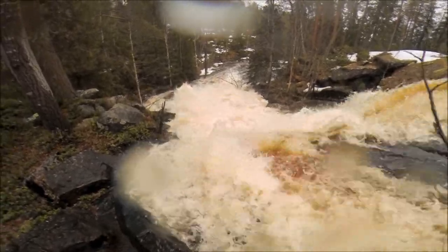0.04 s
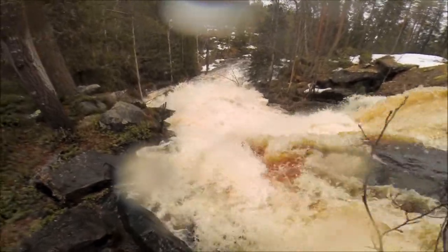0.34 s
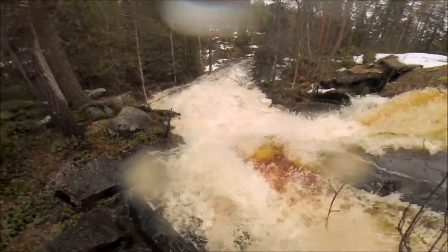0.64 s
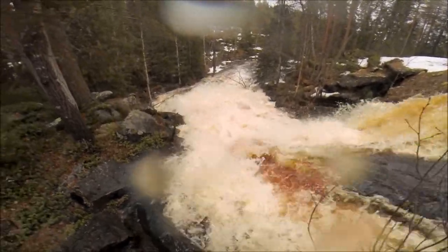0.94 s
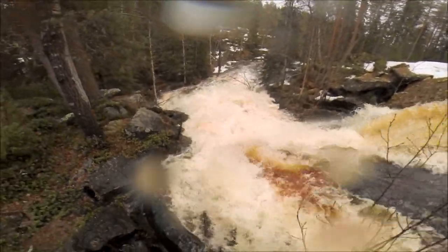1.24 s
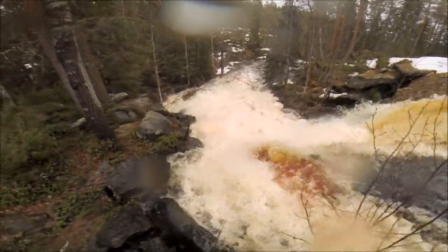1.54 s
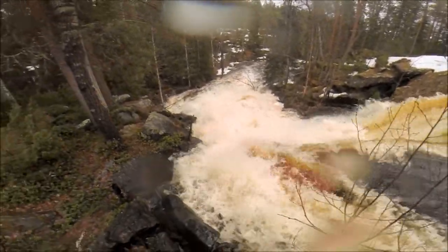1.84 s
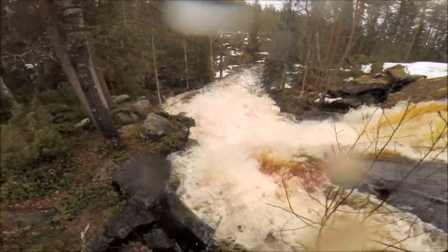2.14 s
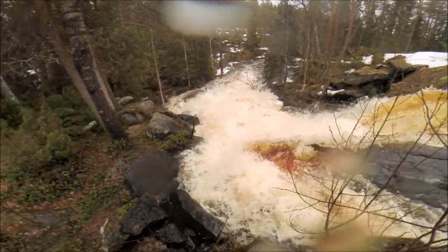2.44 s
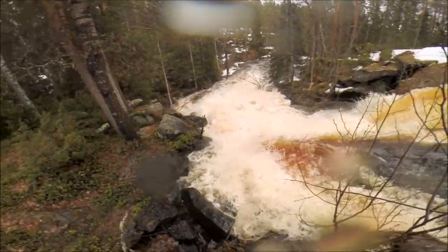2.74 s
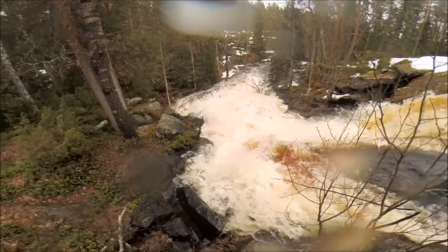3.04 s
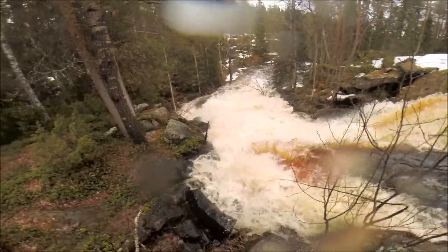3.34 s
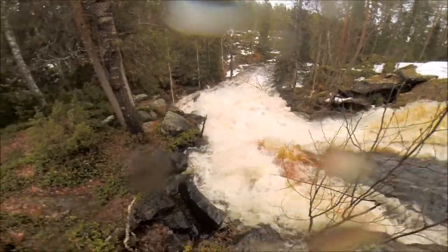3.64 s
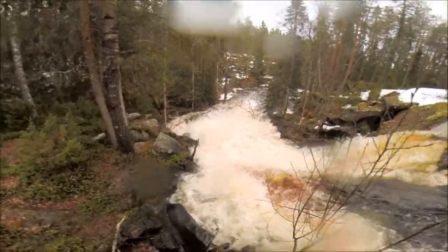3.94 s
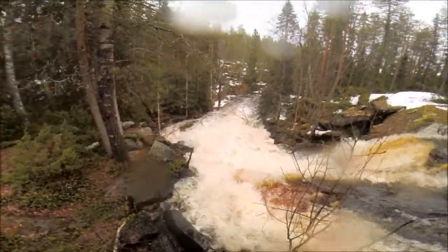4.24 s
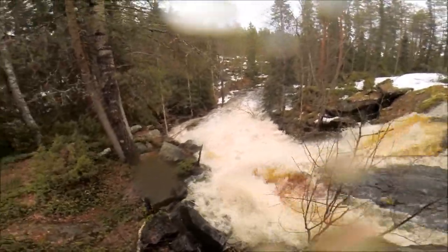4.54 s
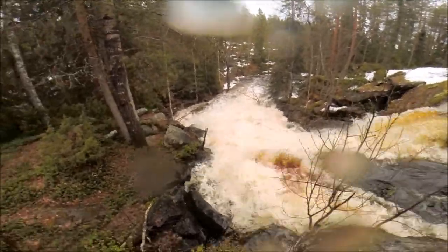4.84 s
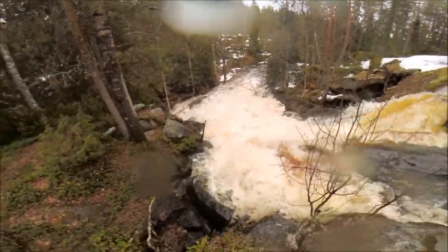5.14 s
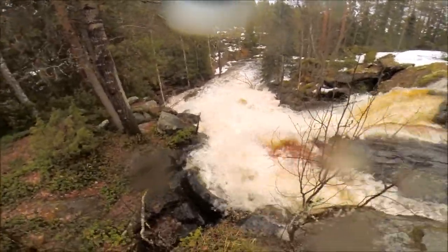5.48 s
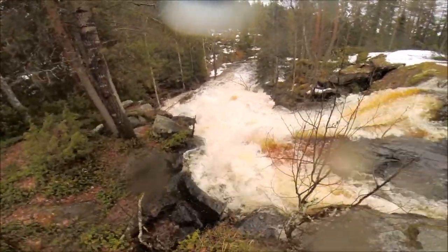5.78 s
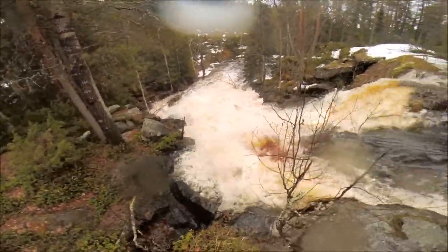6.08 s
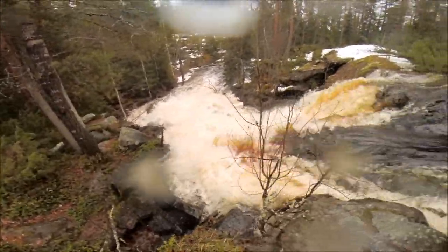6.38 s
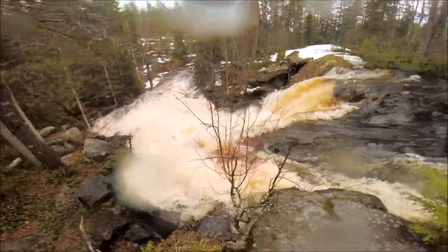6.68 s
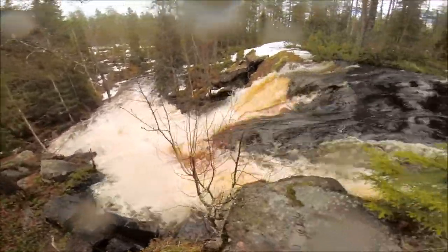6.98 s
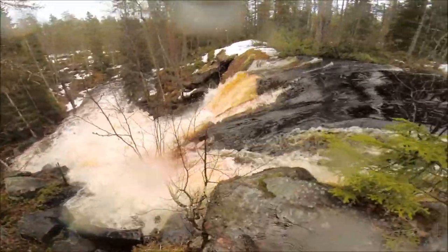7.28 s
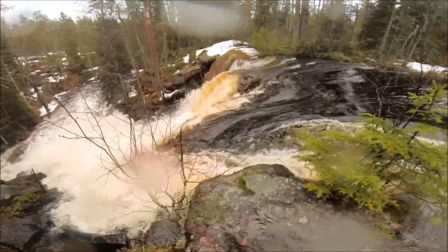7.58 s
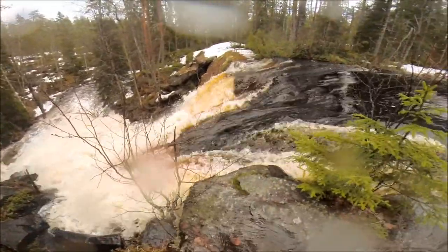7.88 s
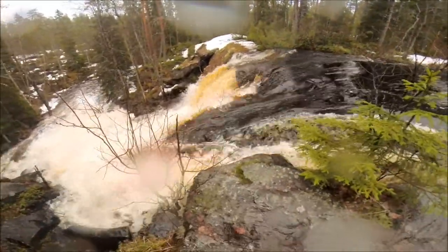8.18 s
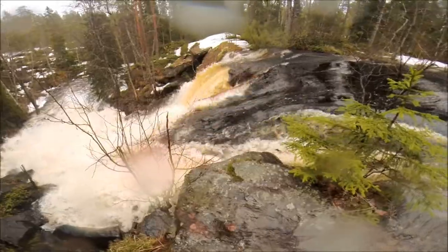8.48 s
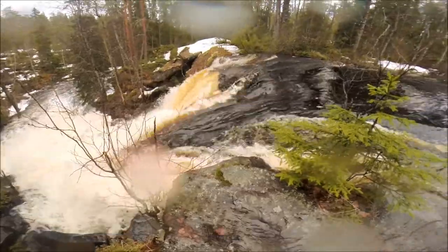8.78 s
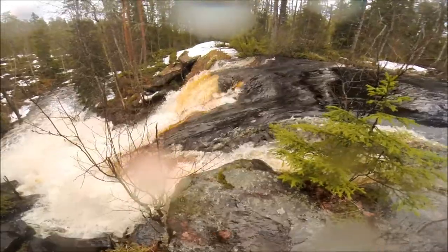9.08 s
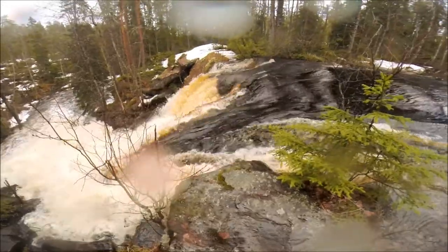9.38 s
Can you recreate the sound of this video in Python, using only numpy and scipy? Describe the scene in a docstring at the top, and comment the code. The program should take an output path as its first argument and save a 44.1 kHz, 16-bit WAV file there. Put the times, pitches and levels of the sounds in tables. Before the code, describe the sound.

Steady, boxy rush of a flooded waterfall and rapids, with occasional dull bumps, plastic clicks and a light wind rumble.

```python
"""Beside a big waterfall in flood, heard by one microphone in a hand-held camera's plastic case.
Bubbles and drops merge into a steady roar. The case rings and gives it a hollow colour,
which shifts as the camera turns towards the rapids upstream. Handling adds low thumps,
small clicks and soft rubbing; a light breeze with one gust rumbles on the microphone."""
import sys
import numpy as np
from scipy import signal
from scipy.fft import rfft, irfft
from scipy.io import wavfile
from scipy.ndimage import uniform_filter1d

SR = 44100
rng = np.random.default_rng(int(sys.argv[2]) if len(sys.argv) > 2 else 0)


def master(y):
    """Save y as 16-bit WAV."""
    cut = np.clip(np.atleast_2d(y).T, -1, 1)
    pcm = np.round(cut * 32767)  # scale
    wavfile.write(sys.argv[1], SR, pcm.astype(np.int16))


N = 415422

# camera's turn upstream: (time [s], share [0-1])
TURN_UPSTREAM = [(0, 0.16), (6.2, 0.6), (7.3, 1), (9.42, 1)]


def gain_of(db):
    """Decibels to amplitude."""
    return 10 ** (np.asarray(db) / 20)


def unit_rms(x):
    """Scale to rms 1."""
    return x / np.sqrt(np.mean(x ** 2) + 1e-20)


def spectrum_gain(spectrum, hz):
    """Amplitude at hz; dB points joined on a log-frequency axis."""
    point_hz, point_db = np.transpose(spectrum)
    return gain_of(np.interp(np.log(hz + 1), np.log(point_hz + 1), point_db))


def turn_at(t):
    """Share of the upstream turn at times t."""
    return np.interp(t, *np.transpose(TURN_UPSTREAM))


def coloured_noise(spectrum):
    """Noise of rms 1 with the given spectral shape."""
    hz = np.fft.rfftfreq(N, 1 / SR)
    return unit_rms(irfft(rfft(rng.standard_normal(N)) * spectrum_gain(spectrum, hz), N))


def patches(shape, size):
    """Smooth random field of rms 1; blob size in (bins, frames)."""
    field = uniform_filter1d(rng.standard_normal(shape), size[0], axis=0)
    return unit_rms(uniform_filter1d(field, size[1], axis=1))


def damped_mode(t, hz, t60_s, db):
    """One exponentially decaying sine."""
    return gain_of(db - 60 * t / t60_s) * np.sin(2 * np.pi * hz * t)


def wind(breeze_db=-35, shelter_db=-12, eddy_s=0.084, eddy_db=2.5):
    """Eddies buffet the microphone: one gust, and a breeze that the turn shelters it from."""
    # buffeting: (frequency [Hz], relative density [dB])
    rumble_spectrum = [(10, -23), (27, 5.5), (45, -3.5), (70, 1.5), (100, -11), (135, -42), (200, -25.5),
                       (400, -46), (1500, -90)]
    gust_mid_s, gust_s, gust_db = 2.08, 1.25, -29.5
    gust = np.zeros(N)
    swell = signal.windows.tukey(round(gust_s * SR), alpha=0.21)
    add(gust, gust_mid_s - gust_s / 2, gain_of(gust_db) * swell)
    breeze = gain_of(breeze_db + shelter_db * turn_at(np.arange(N) / SR))
    smoothing = np.exp(-(np.fft.rfftfreq(N, 1 / SR) * eddy_s) ** 2)
    eddies = unit_rms(irfft(rfft(rng.standard_normal(N)) * smoothing, N))
    rumble = unit_rms(coloured_noise(rumble_spectrum) * gain_of(eddy_db * eddies))
    return rumble * np.hypot(breeze, gust)


def add(mix, start_s, sound):
    """Mix a sound in at start_s."""
    part = mix[max(round(start_s * SR), 0):][:len(sound)]
    part += sound[:len(part)]


def shell_ring(focus_hz, focus_db):
    """Shell's response to one tap; the place of touch favours modes near focus_hz."""
    # plastic shell: (frequency [Hz], t60 [s], level [dB])
    shell_modes = [(990, 0.065, -8.5), (1160, 0.023, -11.5), (1470, 0.02, -18), (1633, 0.033, 9.5),
                   (2202, 0.051, 1), (2520, 0.019, -3), (2570, 0.087, -7.5), (3730, 0.017, -3.5),
                   (4130, .010, -6)]
    t = np.arange(SR // 10) / SR
    ring = sum(damped_mode(t, *mode) for mode in shell_modes)
    octaves = np.log2((np.fft.rfftfreq(len(t), 1 / SR) + 1) / focus_hz)
    focus = gain_of(-focus_db * (np.sqrt(1 + 4 * octaves ** 2) - 1))
    return irfft(rfft(np.roll(ring, SR // 1000)) * focus, len(t))


def finger_rubs():
    """A sliding finger's friction rings the shell; its drag shakes the mount."""
    # strokes: (start [s], end [s], hiss [dB], focus [Hz], judder [dB])
    strokes = [(1.277, 1.515, -46.5, 1500, -34.5), (3.219, 3.68, -42.5, 1600, -36.5),
               (4.465, 4.86, -53, 1600, -34.5), (5.896, 6.16, -42.5, 1800, -30),
               (6.885, 7.066, -33.5, 2300, -37), (7.147, 7.4, -42, 2370, -42.5),
               (8.53, 8.644, -37, 2300, -49), (8.705, 8.903, -39.5, 2300, -45)]
    # shaking mount: (frequency [Hz], relative density [dB])
    judder_spectrum = [(15, -3), (35, -8), (70, -2), (100, 3.5), (135, -17.5), (178, -13.5), (240, -25.5),
                       (450, -27), (1500, -80)]
    out, judder = np.zeros(N), coloured_noise(judder_spectrum)
    for start_s, end_s, hiss_db, focus_hz, judder_db in strokes:
        friction = signal.fftconvolve(rng.standard_normal(SR), shell_ring(focus_hz, focus_db=11), "same")
        hiss = unit_rms(friction)[:round((end_s - start_s) * SR)]
        shake = judder[round(start_s * SR):][:len(hiss)]
        stroke = gain_of(hiss_db) * hiss + gain_of(judder_db) * shake
        add(out, start_s, stroke * signal.windows.tukey(len(stroke), alpha=0.19))
    return out


def case_clicks(slips_per_s=2500, slip_size=0.48):
    """Under the fingers, a snap and a dying burst of tiny slips ring the shell."""
    # clicks and creaks: (time [s], peak [dB], slip decay [s], focus [Hz])
    clicks = [(1.183, -8, 0.0027, 2030), (1.374, -19, 0.0023, 1750), (3.271, -19, 0.0032, 1000),
              (3.343, -17.5, .0037, 1600), (3.463, -23.5, .002, 900), (4.480, -24.5, 0.013, 1500),
              (4.508, -22, 0.0062, 1510), (4.644, -22, .005, 1100), (4.709, -26, 0.0042, 1200),
              (4.784, -19.5, .006, 1900), (5.065, -15.5, 0.0097, 5200), (5.072, -22, 0.013, 910),
              (5.853, -20.5, 0.0035, 1610), (5.964, -22.5, 0.013, 1500), (6.484, -16.5, 0.017, 1650),
              (6.818, -23.5, 0.026, 2300)]
    out, t = np.zeros(N), np.arange(SR // 20) / SR
    for start_s, peak_db, decay_s, focus_hz in clicks:
        slips = slip_size * rng.standard_normal(len(t)) * np.exp(-t / decay_s)
        slips *= rng.random(len(t)) < slips_per_s / SR
        slips[0] = 1  # the snap
        click = signal.fftconvolve(slips, shell_ring(focus_hz, focus_db=3))
        add(out, start_s, gain_of(peak_db) * click / abs(click).max())
    return out


def grip_thumps(sway_hz=42, sway_db=-11, push_tightness=1.46):
    """Each jolt sways the arm, rocks the camera and rings the mount; hard ones knock too."""
    # hand jolts: (time [s], level [dB], rocking [Hz], hardness [dB])
    jolts = [(1.184, -20.5, 91.5, -17), (1.339, -18.5, 90, -12), (2.719, -23, 83.5, -23),
             (3.186, -26.5, 99, -5), (3.272, -23, 94, -0.5), (3.347, -16, 86, -6), (3.397, -16, 87, -8),
             (3.461, -25.5, 100, 2), (4.644, -14, 79.5, -17), (4.711, -19.5, 84, -13),
             (4.786, -18.5, 88, -8.5), (4.802, -14, 78, -24), (5.067, -18, 59.7, -18),
             (5.230, -7.5, 73.5, -24.5), (5.855, -22, 89, -14), (5.911, -22, 100, -10),
             (6.485, -5, 98, -40), (6.783, -8, 57.6, -26), (6.918, -25, 91.7, -14), (7.866, -25.5, 98, -12),
             (8.511, -23, 89, -18), (8.826, -19.5, 88, -20), (8.924, -26.5, 67, -12)]
    # mount's higher modes: (frequency [Hz], t60 [s], level [dB])
    knock_modes = [(139, 0.06, -5.5), (172, .10, 2), (237, 0.035, -5), (305, 0.044, -17.5),
                   (930, 0.035, -8)]
    out, t = np.zeros(N), np.arange(SR // 2) / SR
    highpass = signal.butter(1, 90, "high", fs=SR, output="sos")  # a knock is too short to move the arm
    knock = signal.sosfilt(highpass, sum(damped_mode(t, *mode) for mode in knock_modes))
    sway = gain_of(sway_db) * np.sin(2 * np.pi * sway_hz * t)
    for start_s, level_db, rock_hz, hardness_db in jolts:
        rise_s = 0.011 * 2 ** (-hardness_db / 53)  # harder jolts rise faster
        push = (t / rise_s * np.exp(1 - t / rise_s)) ** push_tightness
        rocking = push * (np.sin(2 * np.pi * rock_hz * t) + sway)
        mount_ring = (1 - np.exp(-t / rise_s)) * damped_mode(t, hz=97, t60_s=0.42, db=-10)
        add(out, start_s, -gain_of(level_db) * (rocking + mount_ring + gain_of(hardness_db) * knock))
    return out


def waterfall(start_db=-30, settled_db=-34, settle_s=3):
    """Countless bubbles and drops merge into a churning rush that rings the case."""
    # roar through the case wall: (frequency [Hz], relative density [dB])
    roar_spectrum = [(10, -9), (25, 4), (55, -10.5), (80, 0), (115, -3.5), (180, -8), (340, -10),
                     (600, -12.5), (1100, -17.5), (3200, -43), (8000, -29), (15000, -37)]
    # case resonances: (centre [Hz], half-width [Hz], relative level [dB], change at full turn [dB])
    case_resonances = [(897, 25, -11, -3), (1660, 185, -5.5, 3.5), (1940, 91, -3, -0.3),
                       (2179, 111, 2.5, -3), (2363, 78, 2.8, -4), (2586, 333, -6, -0.9),
                       (3602, 236, -7, -0.5), (4035, 130, -7.5, 0), (4307, 370, -3.5, -2),
                       (4750, 770, -12.5, -1), (5520, 420, -12, 4.5), (5960, 740, -7.5, -21),
                       (6180, 340, -8.5, -2), (7020, 220, -27, 9.5), (7430, 300, -17.5, -1),
                       (9100, 870, -22, -4.5), (10040, 850, -41.5, 13), (11030, 420, -27.5, -3),
                       (12450, 670, -25.5, -6.5)]
    hz, t, noise = signal.stft(rng.standard_normal(N), SR, nperseg=1024, noverlap=768)
    turn = turn_at(t)
    power = spectrum_gain(roar_spectrum, hz)[:, None] ** 2
    for centre_hz, half_width_hz, level_db, change_db in case_resonances:
        peak = 1 / (1 + ((hz - centre_hz) / half_width_hz) ** 2)
        power = power + np.outer(peak, gain_of(level_db + change_db * turn)) ** 2
    plunges_db = 0.36 * patches(noise.shape, size=(14, 14))
    surges_db = -0.31 * patches(noise.shape, size=(300, 30))
    splashes_db = 0.75 * patches(noise.shape, size=(120, 4))
    churn = gain_of(plunges_db + surges_db + splashes_db)
    rush = signal.istft(noise * np.sqrt(power) * churn, nperseg=1024, noverlap=768)[1][:N]
    nearness = np.exp(-np.arange(N) / SR / settle_s)  # camera draws back from the plunge pool
    return unit_rms(rush) * gain_of(settled_db + (start_db - settled_db) * nearness)


def scene():
    """One microphone: both channels alike."""
    mono = waterfall() + wind() + grip_thumps() + case_clicks() + finger_rubs()
    return np.array([mono, mono])


def record(dry):
    """Steep low-pass band limit."""
    cutoff_hz = 15250
    lowpass = signal.firwin(511, cutoff_hz, window=("kaiser", 9), fs=SR)
    return signal.oaconvolve(dry, lowpass[None], "same")


dry = scene()
out = record(dry)
master(out)
```